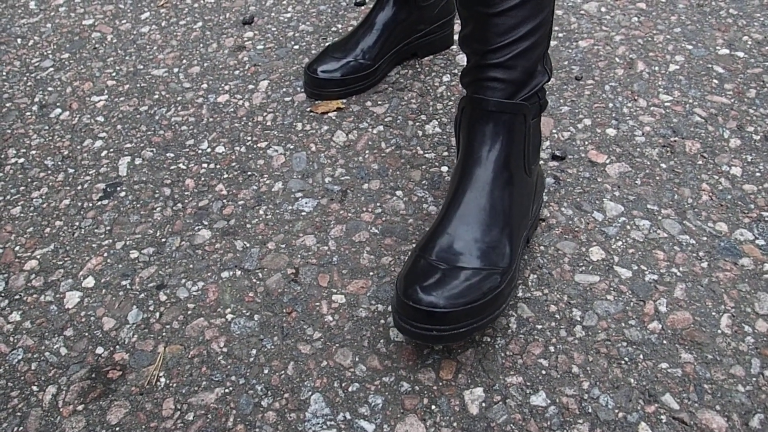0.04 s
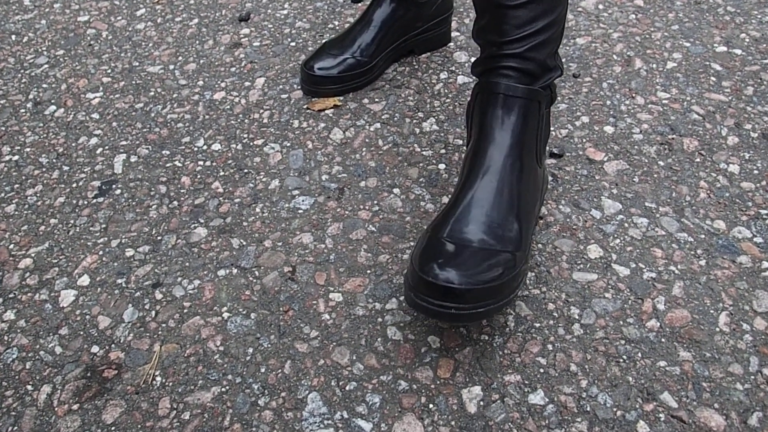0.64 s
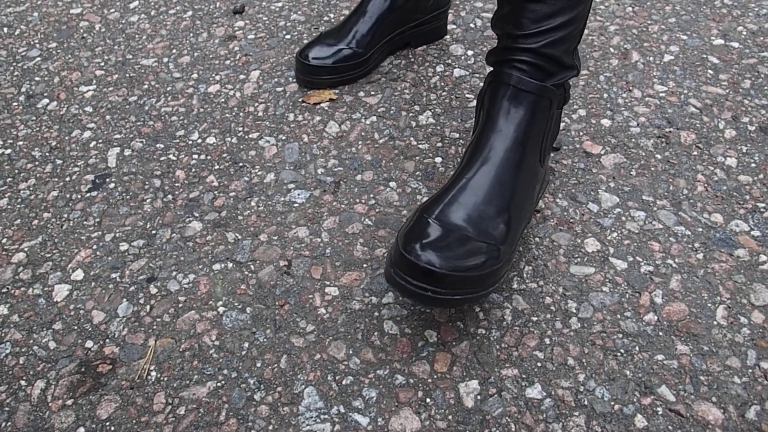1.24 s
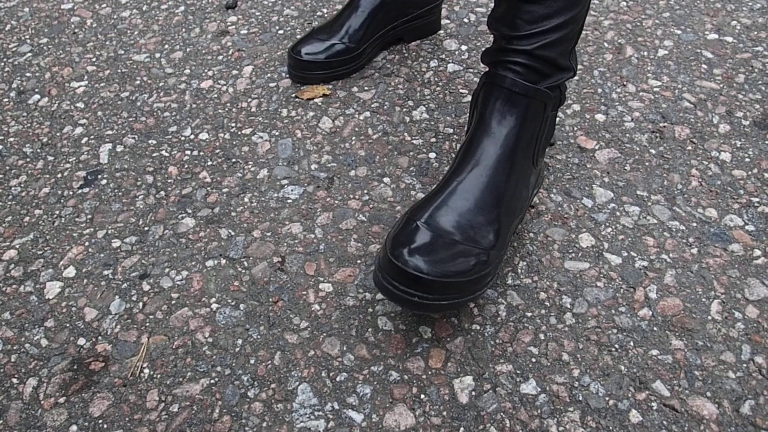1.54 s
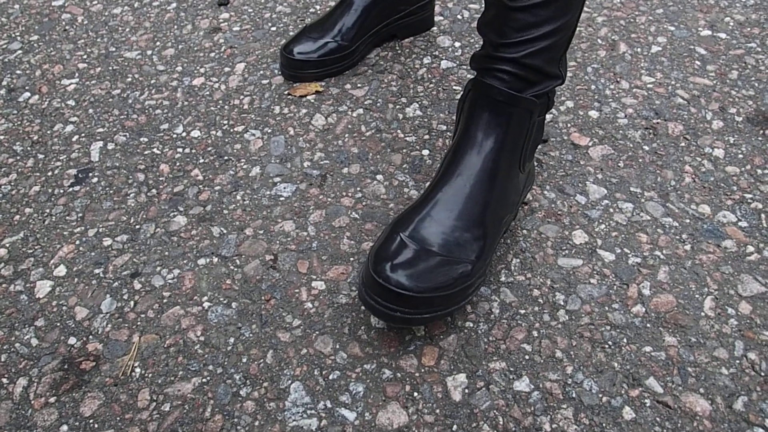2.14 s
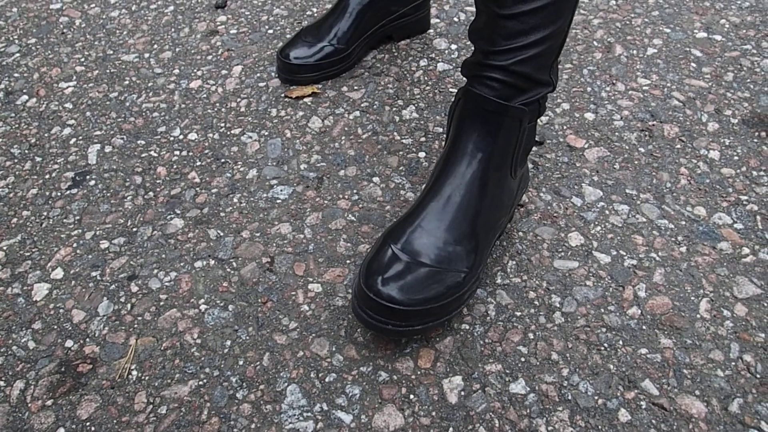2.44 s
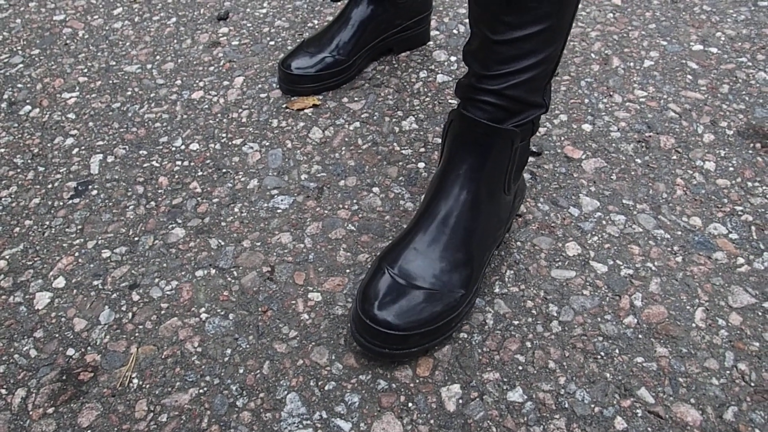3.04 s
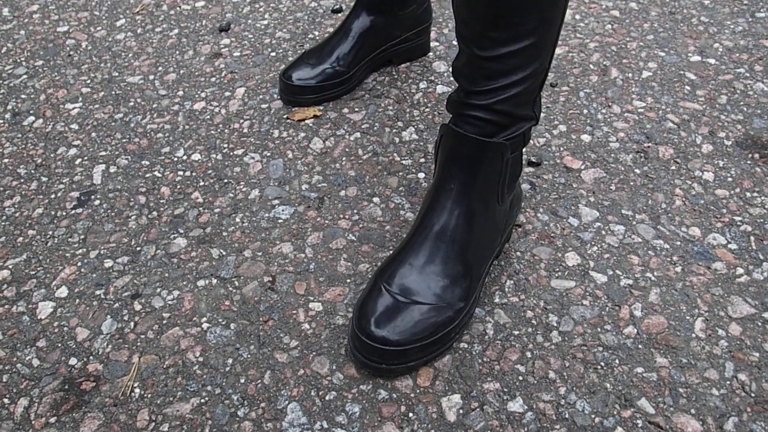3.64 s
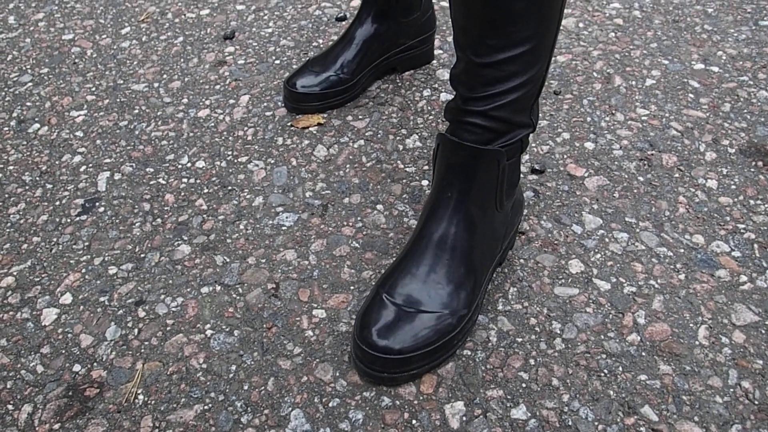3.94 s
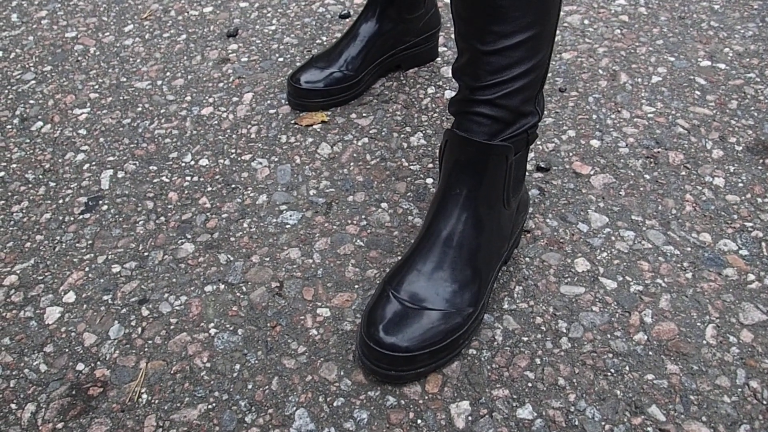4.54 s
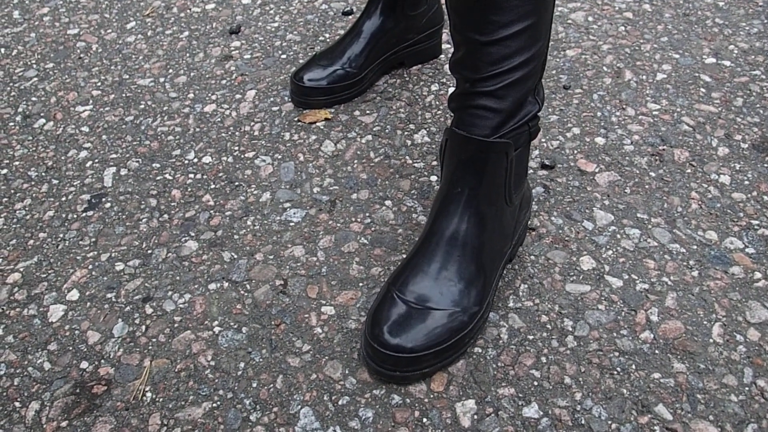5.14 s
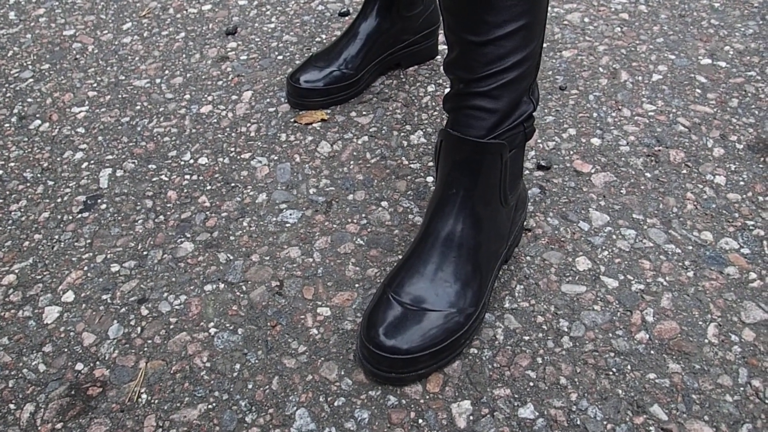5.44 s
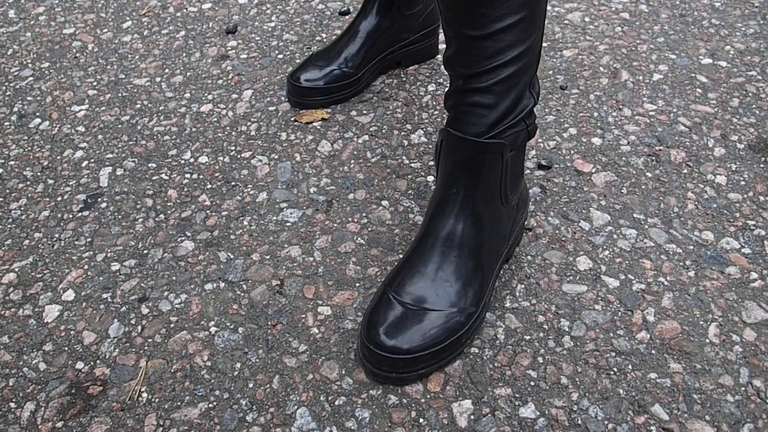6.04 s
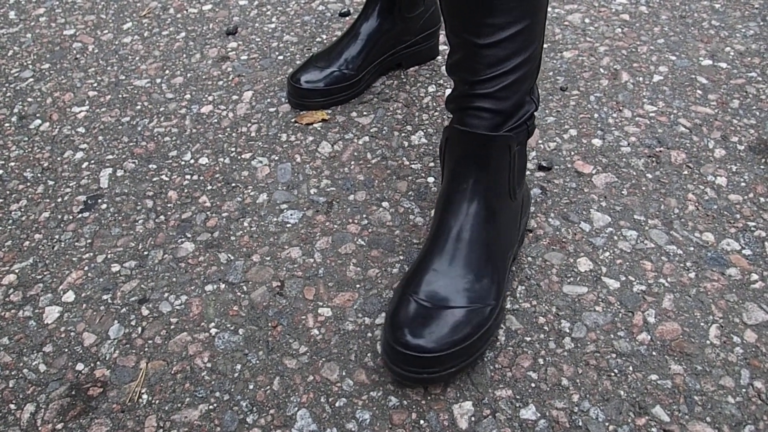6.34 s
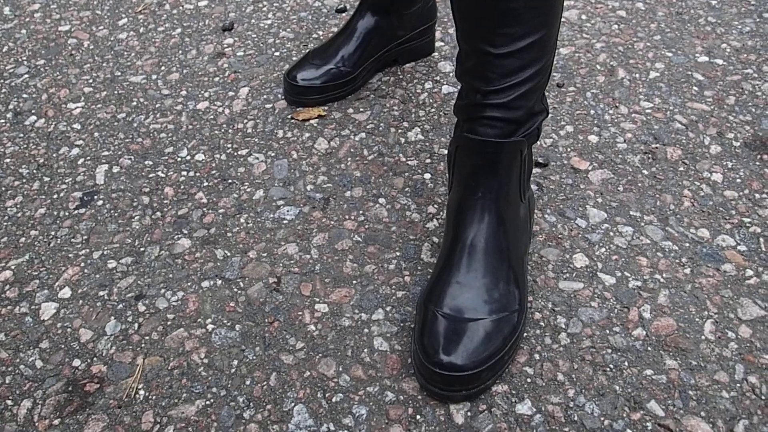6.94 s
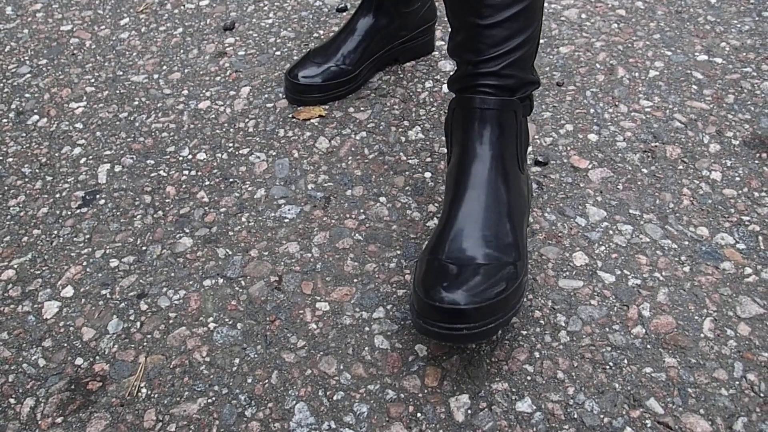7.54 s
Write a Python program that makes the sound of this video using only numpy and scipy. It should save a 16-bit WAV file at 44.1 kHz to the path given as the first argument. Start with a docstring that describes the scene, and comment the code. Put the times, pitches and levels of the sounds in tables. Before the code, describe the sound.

Outdoors, a dull town rumble carries on while light wind puffs against the left microphone. Nearby on the right, a rubber sole scuffs and twists on sandy pavement, making repeated crackly scrapes and short runs of crunching, with a few faint, dull thumps from the boot. The scraping softens near the end as the tyre roar and low drone of a far-off vehicle grow louder.

```python
"""A low town rumble and a light breeze on the left; then, close on the right, a rubber boot pivots on asphalt.
Sand grinds under each push of the sole as a stream of tiny clicks. The rubber thumps as it flexes,
stones knock against the tread, and bits of grit snap free with a short, bright ring.
Far off, a motor vehicle draws nearer, its tyre roar and drone swelling to the end."""
import sys
import numpy as np
from scipy import signal
from scipy.fft import rfft, irfft
from scipy.io import wavfile
from scipy.ndimage import uniform_filter1d

SR = 44100
rng = np.random.default_rng(int(sys.argv[2]) if len(sys.argv) > 2 else 0)


def wav_record(signal):
    """Record a signal, one row per channel, as 16-bit PCM in the file named by sys.argv[1]."""
    frames = np.transpose(np.atleast_2d(signal))
    bounded = np.clip(frames, -1, 1)
    # unit amplitude maps onto the largest positive 16-bit level
    quanta = np.round(bounded * 32767).astype(np.int16)
    wavfile.write(sys.argv[1], SR, quanta)


N = 343098
TIME = np.arange(N) / SR


def undb(db):
    """Decibels to gain."""
    return 10 ** (np.asarray(db) / 20)


def unit(x):
    """Scale to rms 1."""
    return x / np.sqrt(np.mean(x ** 2))


def colour(x, spectrum, size=4096):
    """Minimum-phase EQ through (f/Hz, level/dB) points: a click rings out after it strikes."""
    hz, db = np.transpose(spectrum)
    grid_hz = np.maximum(np.fft.rfftfreq(size, 1 / SR), 1)
    gain = undb(np.interp(np.log(grid_hz), np.log(hz), db))
    cepstrum = irfft(np.log(gain))
    cepstrum[1:size // 2] *= 2
    cepstrum[size // 2 + 1:] = 0
    impulse = irfft(np.exp(rfft(cepstrum)))
    return signal.oaconvolve(x, impulse)[:len(x)]


def noise(spectrum):
    """Noise with the given spectrum in dB per Hz."""
    return colour(rng.standard_normal(N), spectrum) * np.sqrt(SR / 2)


def drift(per_s):
    """Smooth random modulation with rms 1."""
    hold = max(int(SR / per_s), 1)
    steps = np.repeat(rng.standard_normal(N // hold + 1), hold)
    return unit(uniform_filter1d(steps, hold)[:N])


def grains(per_s, spread_db):
    """Random clicks of uneven size at rms 1; their density may move without changing the power."""
    chance = np.clip(per_s / SR, 1e-4, 1)
    size = undb(spread_db * np.clip(rng.standard_normal(N), -2, 2)) * rng.choice([-1, 1], N)
    return unit((rng.random(N) < chance) * size / np.sqrt(chance))


def strike(spectrum, tail_s, tail, window_s, size=2048):
    """One blow: a coloured click with a noisy tail, at rms 1 over its loudest window."""
    blow = tail * rng.standard_normal(size) * np.exp(-np.arange(size) / SR / tail_s)
    blow[0] += 1
    ring = colour(blow, spectrum)
    power = uniform_filter1d(ring ** 2, max(int(window_s * SR), 1), mode="constant")
    return ring / np.sqrt(power.max())


def add(track, t, sound):
    """Mix a short sound into a track at t seconds."""
    i = int(np.clip(t * SR, 0, N - 1))
    track[i:i + len(sound)] += sound[:N - i]


def distant_bed(spectrum, left_db, crossover_hz):
    """Diffuse far-off noise: both sides share the bass, and the left is shaded more above it."""
    bass = signal.sosfilt(signal.butter(1, crossover_hz, fs=SR, output="sos"), noise(spectrum))
    highpass = signal.butter(1, crossover_hz, "high", fs=SR, output="sos")
    left, right = (signal.sosfilt(highpass, noise(spectrum)) for _ in range(2))
    return np.array([undb(left_db / 2) * bass + undb(left_db) * left, bass + right])


# Dull wash of the town: f/Hz, level/dB per Hz
TOWN_SPECTRUM = [(20, -108), (70, -89.5), (220, -85), (390, -86.5), (520, -82.5), (610, -83.5),
                 (720, -81.5), (880, -84.5), (990, -82), (1200, -84.5), (1600, -88), (2200, -95.5),
                 (2700, -106), (5000, -118)]

def town():
    """The distant town blends into a rumble whose level barely wanders."""
    return distant_bed(TOWN_SPECTRUM, left_db=-2, crossover_hz=206) * undb(0.7 * drift(2.82))


# Bass-heavy wind on the microphone: f/Hz, level/dB per Hz
BREEZE_SPECTRUM = [(15, -87), (35, -78), (65, -68.5), (110, -82.5), (200, -84), (350, -87.5), (600, -108),
                   (2000, -140)]
# Puffs on top of the breeze: t/s, level/dB relative to the steady breeze
PUFFS = [(.24, 6), (.84, 4), (1.3, 1), (1.41, 6), (2.06, 2), (2.88, 8), (3.59, 5), (4.18, 7), (4.87, 4),
         (6.96, 13)]

def breeze(trim_db=-3.5, right_db=-16, flutter_db=2.6, puff_s=0.027):
    """Air buffets mostly the left microphone, with a low flutter and a few stronger puffs."""
    puff_power = sum(undb(db) ** 2 * np.exp(-((TIME - t) / puff_s) ** 2) for t, db in PUFFS)
    envelope = np.sqrt(1 + puff_power) * undb(trim_db + flutter_db * drift(11))
    return envelope * np.array([noise(BREEZE_SPECTRUM), undb(right_db) * noise(BREEZE_SPECTRUM)])


# Pushes of the pivoting sole: start t/s, attack/s, release/s, level/dB, share of fine sand/dB
PUSHES = [(0.235, 0.055, 0.076, -29, -12.5), (.39, 0.13, 0.067, -39, -12), (.535, 0.019, 0.046, -37, -9.5),
          (.6, 0.17, .32, -47.5, -9), (1.2, 0.17, .1, -42.5, -19), (1.35, 0.13, 0.11, -32.5, -18),
          (1.49, 0.13, 0.1, -28, -15.5), (1.81, 0.04, .1, -39.5, -12), (1.93, 0.13, 0.24, -46.5, -20),
          (2.25, .26, 0.18, -43.5, -14), (2.58, .11, .12, -44, -16), (2.8, 0.3, 0.29, -46.5, -23),
          (3.22, 0.29, 0.19, -38.5, -14), (3.64, .04, 0.059, -39, -9), (3.71, 0.088, 0.11, -42.5, -12),
          (4.12, 0.033, 0.068, -42, -6), (4.19, 0.026, .06, -35, -14), (4.25, .035, .04, -43.5, -7),
          (4.32, 0.087, .1, -50.5, -20), (4.5, .09, 0.079, -44, -14), (4.63, 0.038, 0.089, -34.5, -11.5),
          (4.73, 0.066, 0.35, -43, -9), (4.98, .2, .14, -43.5, -13), (5.24, 0.19, 0.19, -42, -11.5),
          (5.48, 0.09, .1, -35, -14), (5.585, 0.082, 0.084, -28, -11), (5.855, 0.044, 0.11, -38, -5.5),
          (6.12, 0.026, .08, -42, -9), (6.14, 0.082, 0.064, -37, -12), (6.22, .05, 0.28, -50, -14),
          (6.55, 0.39, 0.52, -43.5, -19), (7.35, 0.46, 0.36, -48, -24)]

def sole_slide(creep_db=-51.5, creep_sand_db=-27, attack_curve=1.08, release_curve=1.23):
    """The loaded sole creeps, and each push swells and eases: gives level and fine-sand share in dB."""
    power = np.full(N, undb(creep_db) ** 2)
    sand_power = power * undb(creep_sand_db) ** 2
    for start, attack_s, release_s, db, sand_db in PUSHES:
        swell = np.clip((TIME - start) / attack_s, 0, 1) ** attack_curve
        ease = np.clip((start + attack_s + release_s - TIME) / release_s, 0, 1) ** release_curve
        push = undb(db) * np.sin(np.pi / 2 * swell * ease)
        power += push ** 2
        sand_power += (push * undb(sand_db)) ** 2
    return 10 * np.log10(power), 10 * np.log10(sand_power / power)


# Grinding grit, bright on the near right and faint on the left: f/Hz, level/dB
GRIT_RIGHT_EQ = [(300, -45), (1000, -28), (2100, -19), (2700, -27), (3200, -17.5), (4000, -22), (4400, -11),
                 (4800, -2), (5300, 4.5), (6100, -1), (7000, -7.5), (8000, -6.5), (9500, -23.5),
                 (15500, -36)]
GRIT_LEFT_EQ = [(300, -26.5), (1500, -47), (4000, -62), (5200, -54), (6400, -27), (7600, -26), (9500, -34),
                (15500, -56)]
# Sizzle of the finest sand: f/Hz, level/dB
SAND_EQ = [(2000, -20), (4000, -18), (6200, -1), (8000, 6.5), (9800, -3), (12000, -4), (15500, -5)]

def sole_scrape(judder_db=1.0, steadying=0.41, crowding=0.6, sand_boost_db=2, rub_db=-23):
    """Sand grinds under the sole: faster sliding rolls more grains and steadies the stick-slip judder."""
    slide_db, sand_share_db = sole_slide()
    speed = undb(slide_db - np.median(slide_db))
    envelope = undb(slide_db + judder_db * drift(260) / np.maximum(speed, 1) ** steadying)
    density = speed ** crowding
    grit = envelope * grains(per_s=5500 * density, spread_db=4)
    grit /= np.std(colour(rng.standard_normal(N), GRIT_RIGHT_EQ))  # make-up gain for the EQ
    sizzle = unit(colour(grains(per_s=2500 * density, spread_db=5), SAND_EQ))
    sand = envelope * undb(sand_share_db + sand_boost_db) * sizzle
    # coarser stones rub the tread itself, lower in pitch
    rub = undb(slide_db + rub_db) * unit(colour(grains(per_s=600, spread_db=2.5), TREAD_EQ))
    return np.array([colour(grit, GRIT_LEFT_EQ), colour(grit, GRIT_RIGHT_EQ) + sand + rub])


# Dull body of the flexing rubber: f/Hz, level/dB
RUBBER_EQ = [(30, -16), (90, -17), (200, 1.5), (290, -3), (420, -11.5), (700, -16), (2000, -59)]
# Flexes of the boot: t/s, level/dB before trim
FLEXES = [(.219, -46.5), (.783, -47.5), (1.157, -45), (1.183, -42), (1.78, -44.5), (2.831, -45),
          (2.850, -39.5), (2.872, -43), (3.133, -46), (3.156, -44), (3.176, -44), (3.206, -42),
          (3.242, -45), (6.872, -40.5), (6.932, -40)]

def rubber_thumps(trim_db=-2):
    """The boot's wall buckles in single soft pulses, heard in the centre."""
    track = np.zeros(N)
    for t, db in FLEXES:
        add(track, t, undb(db + trim_db) * strike(RUBBER_EQ, tail_s=0.0021, tail=0.015, window_s=0.0025))
    return np.array([track, track])


# Midrange knock of the tread: f/Hz, level/dB
TREAD_EQ = [(300, -29), (780, -9), (970, 1.5), (1170, -6), (1430, -0.5), (1750, -10.5), (2150, -13),
            (3200, -21), (5000, -23), (9000, -47)]
# Slips off a stone: t/s, level/dB before trim
STONE_SLIPS = [(.264, -39.5), (.403, -40), (0.415, -41.5), (.569, -42), (1.652, -42), (1.673, -42),
               (1.824, -41), (1.836, -40.5), (1.850, -35), (2.316, -36), (2.459, -43.5), (2.527, -42.5),
               (2.552, -40), (4.701, -43.5), (4.954, -45), (6.214, -39), (6.264, -48)]

def tread_knocks(trim_db=-1, left_db=-12):
    """Tread blocks slip off stones with a small, dead knock."""
    track = np.zeros(N)
    for t, db in STONE_SLIPS:
        add(track, t, undb(db + trim_db) * strike(TREAD_EQ, tail_s=0.004, tail=0.27, window_s=0.00097))
    return np.array([undb(left_db) * track, track])


# Ring of one snapping bit of grit: f/Hz, level/dB
RING_EQ = [(300, -54), (1100, -14), (2200, -26), (3800, -23.5), (4400, -15.5), (4900, 1), (5400, 5.5),
           (6100, -4.5), (7000, -8.5), (8100, -8.5), (10000, -22.5), (15500, -36)]
# Larger bits snapping free: t/s, level/dB, brightness/dB
BIG_SNAPS = [(0.4163, -36, 4.5), (0.4498, -35, -24), (0.46, -29, -23), (1.2349, -34.5, -23),
             (1.3324, -34, -22), (1.6518, -27, -23), (1.6725, -31, -25), (1.826, -36, -9),
             (1.8465, -26.5, -25), (1.8901, -31.5, -20), (2.5124, -30.5, -14), (2.5522, -27, -25),
             (2.61, -30, -24), (2.6715, -31, -23), (3.5731, -24, -24), (3.5995, -32, -21),
             (3.6649, -26.5, -20), (3.684, -28, -18), (3.71, -26.5, -12), (3.7505, -32, -18),
             (4.7737, -23, -20), (4.7885, -23.5, -13), (4.9524, -26.5, -13), (5.0555, -27.5, -10),
             (5.1057, -28, -25), (5.1827, -28, -24), (5.2115, -33, -17), (5.2785, -30, -24),
             (5.5485, -27.5, -24), (5.6035, -27, -21), (5.6345, -22.5, -18), (5.6726, -23, -21),
             (5.889, -30, -20), (5.923, -28, -13), (6.1314, -29.5, -10), (6.376, -34.5, -25)]

def grit_snaps(crack_boost_db=2, left_db=-25):
    """Each bit of grit, large or small, rings briefly; the sharper the break, the louder its crack."""
    track = np.zeros(N)
    for t, db, bright_db in list(BIG_SNAPS) + crunch_cues():
        ring = strike(RING_EQ, tail_s=0.0021, tail=0.17, window_s=0.0013)
        crack = strike(SAND_EQ, tail_s=0.002, tail=0.087, window_s=0.0014)
        add(track, t, undb(db) * (ring + undb(bright_db + crack_boost_db) * crack))
    return np.array([undb(left_db) * track, track])


# Spells of crunching: start t/s, end t/s, typical level/dB
CRUNCH_SPELLS = [(1.423, 1.68, -35), (2.483, 2.72, -37.5), (3.541, 3.72, -37), (4.74, 5.351, -35.5),
                 (5.522, 5.72, -30.5)]

def crunch_cues(per_s=30, spread_db=2.5, bright_db=-10):
    """Weight on loose grit sets off uneven runs of small snaps: rows of t/s, level/dB, brightness/dB."""
    cues = []
    for start, end, db in CRUNCH_SPELLS:
        for t in np.arange(start, end, 1 / per_s):
            jitter, size = rng.standard_normal(2)
            cues.append((t + 0.3 * jitter / per_s, db + spread_db * size, bright_db))
    return cues


# Far-off tyre roar: f/Hz, level/dB per Hz
TYRE_SPECTRUM = [(30, -106), (70, -85), (100, -83.5), (170, -72), (260, -78.5), (380, -83), (510, -70.5),
                 (600, -72), (690, -69.5), (900, -74), (1000, -73), (1700, -82), (2600, -96), (3100, -91.5),
                 (4500, -106)]
# Fader ride of the approach: t/s, level/dB
APPROACH_FADE = [(0, -28), (2.5, -13), (4, -15), (5, -9.5), (5.8, -6.5), (6.5, -4), (7.1, -2.5), (7.5, 0),
                 (7.78, 1.5)]

def vehicle(hum_hz=145, hum_db=-61, exhaust_hz=169, exhaust_db=-64, drone_follow=0.96):
    """Tyre roar and a wavering two-tone drone rise out of the rumble as the vehicle nears."""
    near_db = np.interp(TIME, *np.transpose(APPROACH_FADE))
    tyres = distant_bed(TYRE_SPECTRUM, left_db=-16, crossover_hz=284) * undb(near_db + 0.5 * drift(9))
    drone = np.zeros(N)
    for hz, db, waver in ((hum_hz, hum_db, 0.008), (exhaust_hz, exhaust_db, 0.03)):
        phase = 2 * np.pi * np.cumsum(hz * (1 + waver * drift(9))) / SR
        envelope = undb(db + drone_follow * near_db + 0.97 * drift(11))
        drone += np.sqrt(2) * np.sin(phase) * envelope
    return tyres + np.array([0.8 * drone, 1.1 * drone])


def scene():
    """The close boot between the outdoor bed and the approaching vehicle, as (left, right)."""
    bed = town() + breeze()
    boot = sole_scrape() + rubber_thumps() + tread_knocks() + grit_snaps()
    return bed + boot + vehicle()


# Microphone hiss: f/Hz, level/dB per Hz
HISS_SPECTRUM = [(100, -104), (2200, -99), (2700, -103), (3100, -100), (4100, -107), (4600, -98),
                 (5200, -93.5), (6400, -92), (7200, -91.5), (8000, -88), (9000, -95), (11000, -97),
                 (15500, -98.5)]
# Narrow notches in the microphones' response: f/Hz, nominal width/Hz, level/dB
NOTCHES = [(1864, 102, -12.5), (3394, 76, -23), (3980, 90, -14), (4220, 61, -10.5), (4837, 103, -27)]

def record(dry, top_hz=15900):
    """The microphones add hiss and narrow notches, and a steep low-pass cuts the top."""
    wet = dry + np.array([noise(HISS_SPECTRUM), noise(HISS_SPECTRUM)])
    for hz, width_hz, db in NOTCHES:
        q = hz / (width_hz * undb(-db / 4))  # deeper notches get wider skirts
        band = signal.lfilter(*signal.iirpeak(hz, q, fs=SR), wet)
        wet += (undb(db) - 1) * band
    return signal.sosfilt(signal.ellip(10, 0.2, 70, top_hz, fs=SR, output="sos"), wet)


dry = scene()
out = record(dry)
wav_record(out)
```